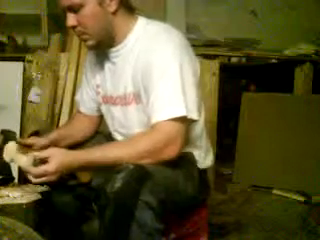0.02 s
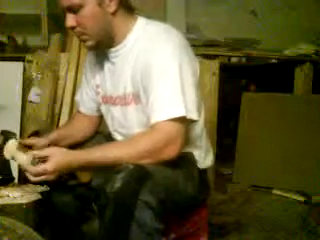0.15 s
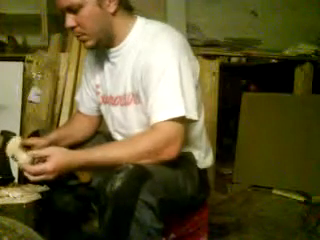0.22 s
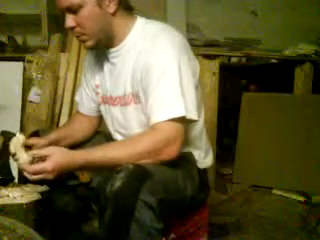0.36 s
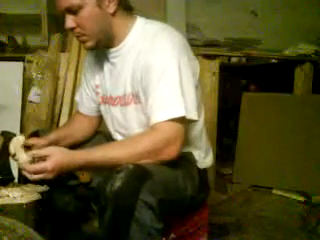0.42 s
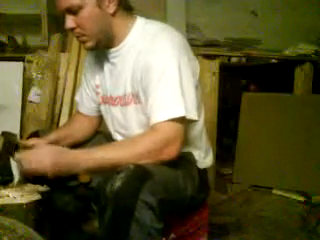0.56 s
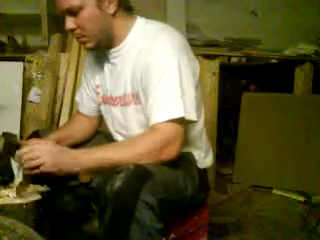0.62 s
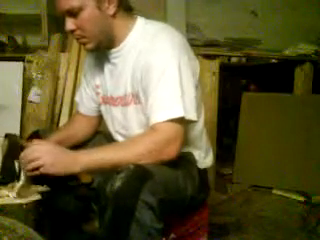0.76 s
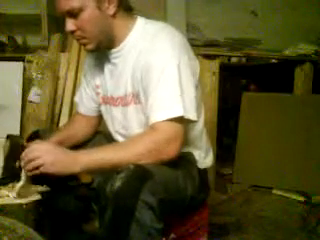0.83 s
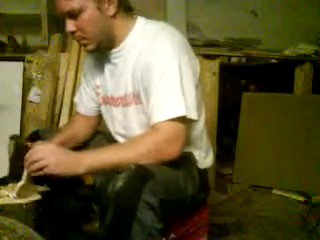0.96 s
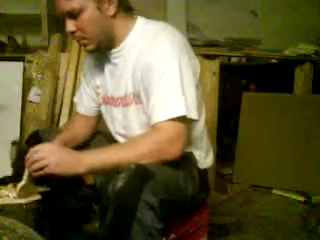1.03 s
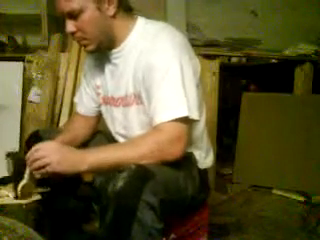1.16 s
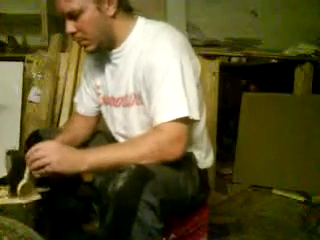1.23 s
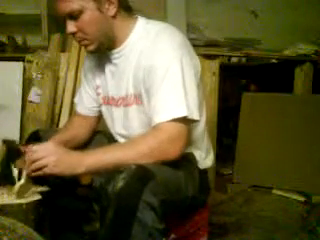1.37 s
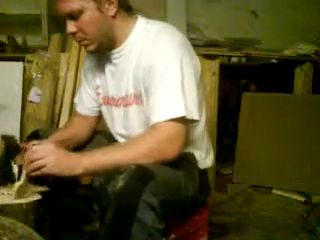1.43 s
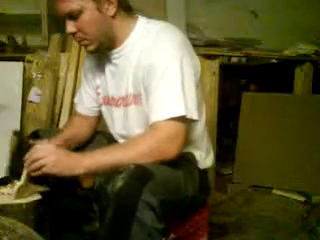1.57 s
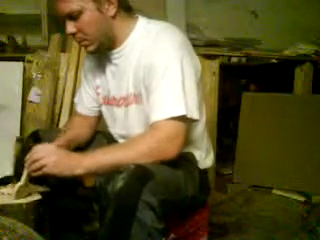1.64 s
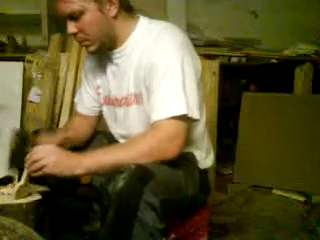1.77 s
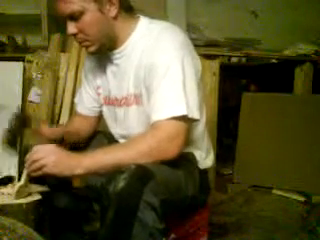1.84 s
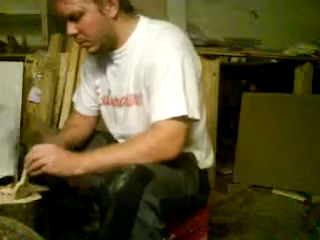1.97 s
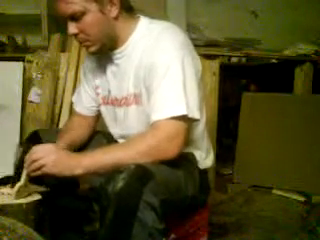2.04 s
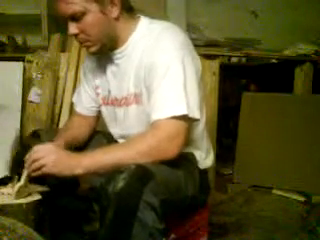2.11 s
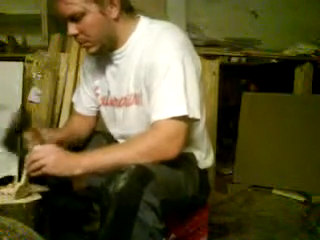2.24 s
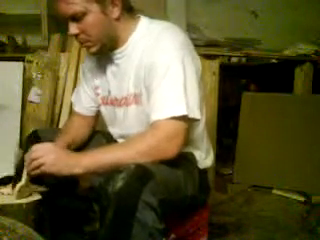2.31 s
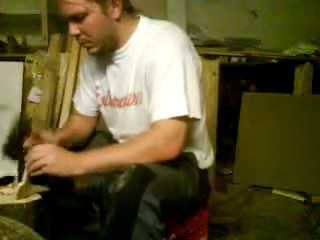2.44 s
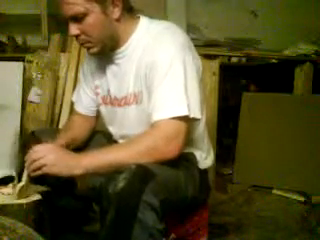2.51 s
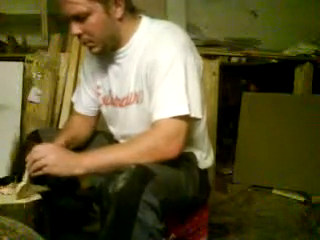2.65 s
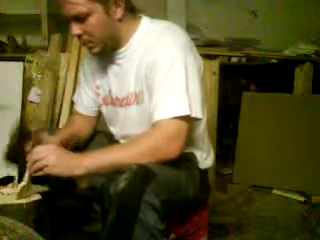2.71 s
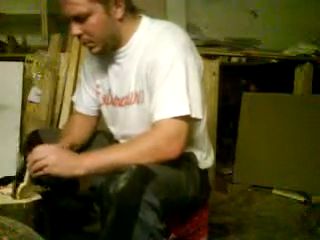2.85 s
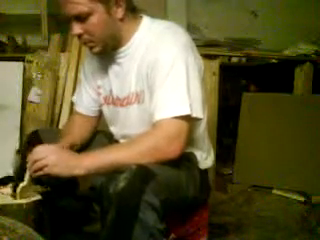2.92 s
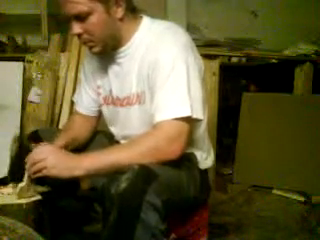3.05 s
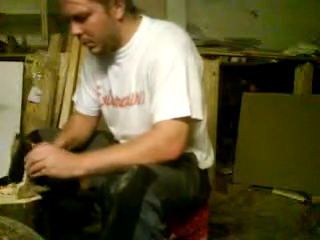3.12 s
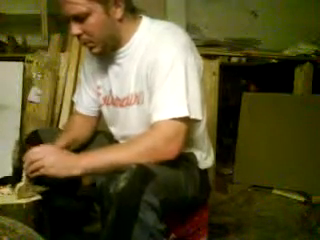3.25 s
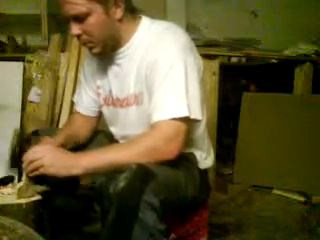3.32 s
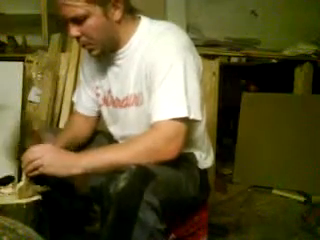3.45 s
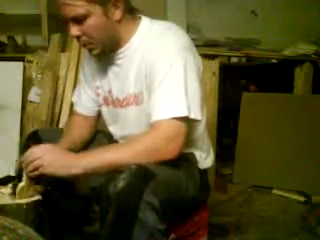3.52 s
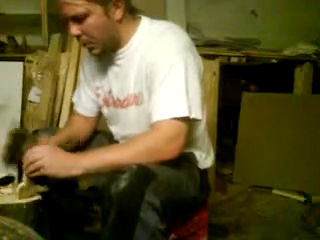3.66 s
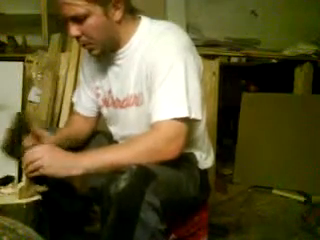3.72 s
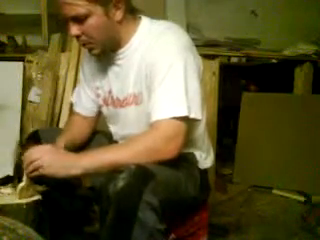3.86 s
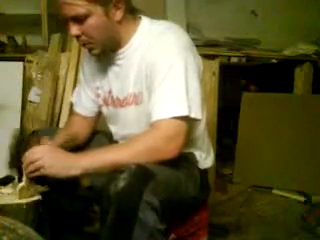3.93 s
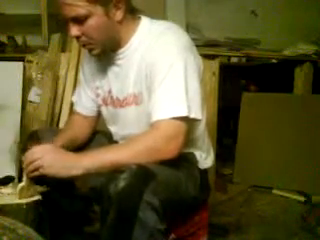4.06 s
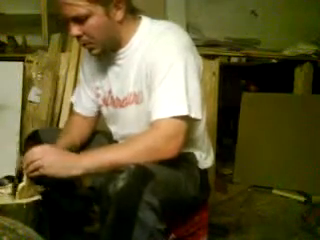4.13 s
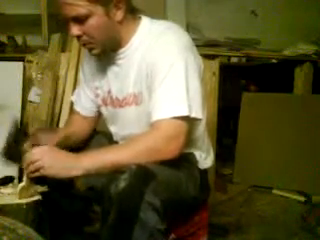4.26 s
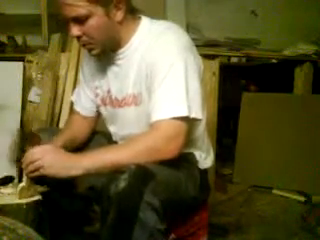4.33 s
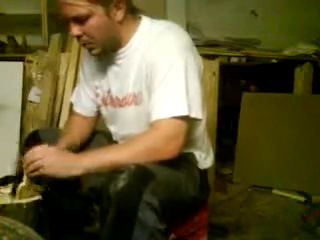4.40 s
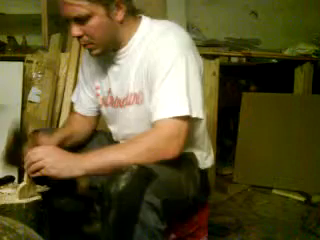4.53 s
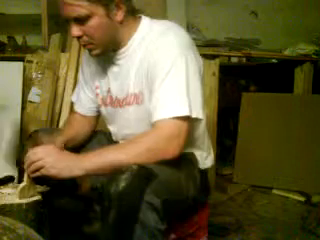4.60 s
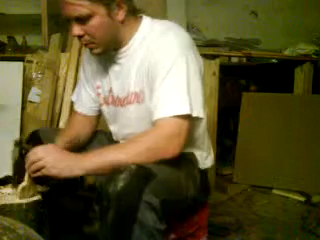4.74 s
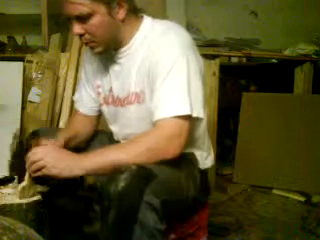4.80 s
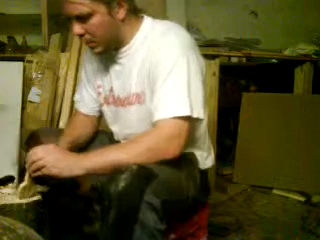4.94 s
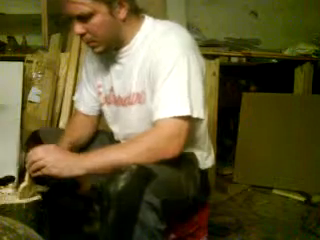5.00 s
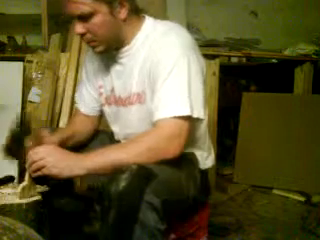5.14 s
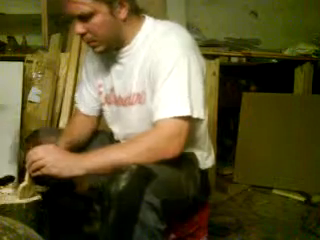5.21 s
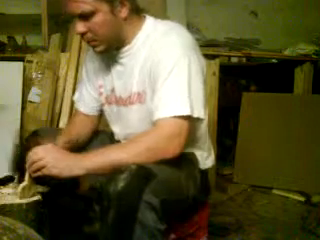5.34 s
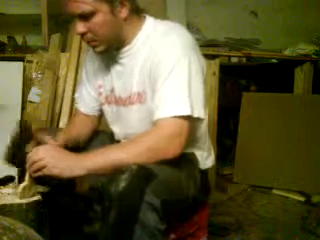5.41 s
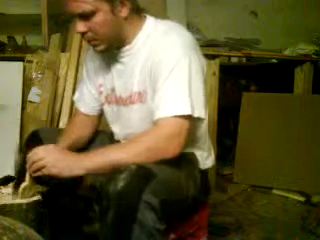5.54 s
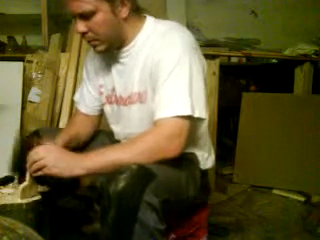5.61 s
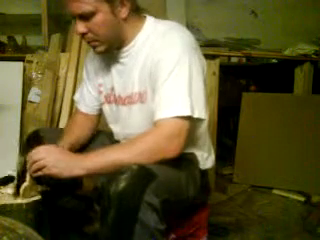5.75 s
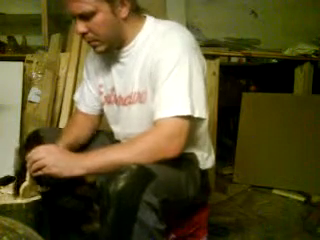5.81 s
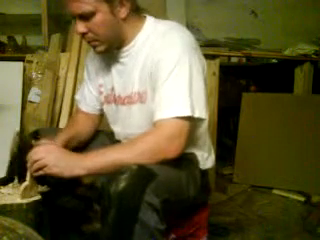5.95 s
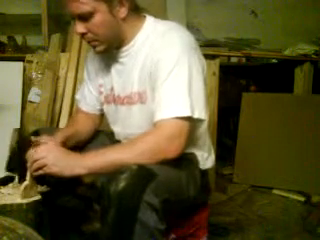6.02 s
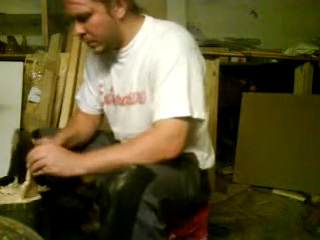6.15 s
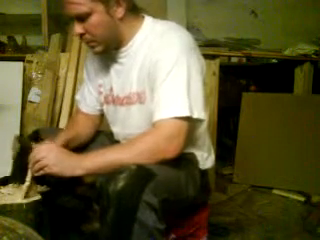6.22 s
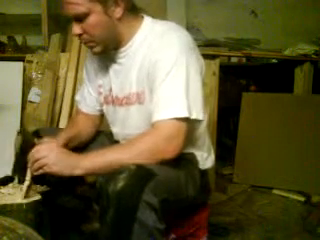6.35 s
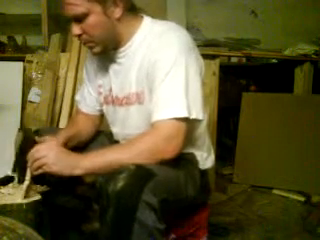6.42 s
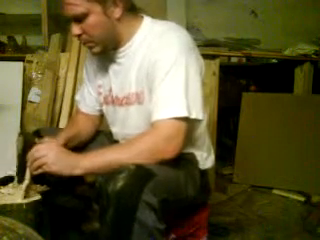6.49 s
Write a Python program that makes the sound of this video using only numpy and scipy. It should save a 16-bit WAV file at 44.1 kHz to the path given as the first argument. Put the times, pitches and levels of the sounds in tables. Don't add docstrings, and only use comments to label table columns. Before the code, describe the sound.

Quiet room hiss opens for about a second, then a few soft taps and a faint scrape of blade on wood. From two seconds, a hatchet chops a billet on a block with sharp, dry cracks and low woody thuds, roughly every 0.3 seconds, in a narrow echoing workshop. A small microphone sounds slightly dull and squashed by the loud blows.

```python
import sys
import numpy as np
from scipy import signal
from scipy.fft import rfft, irfft
from scipy.io import wavfile

SR = 44100
rng = np.random.default_rng(int(sys.argv[2]) if len(sys.argv) > 2 else 0)


def transcribe(signal):
    frames = np.atleast_2d(signal).T
    limited = np.clip(frames, -1, 1)
    pcm = np.round(limited * 32767).astype(np.int16)
    wavfile.write(sys.argv[1], SR, pcm)


def how_loud(loudness_db):
    steps = np.asarray(loudness_db, float) / 20
    return 10 ** steps


N = 289679

KNEE_DB, SQUEEZE = -15, 0.34
# start_s, bite_db, brightness (dB per octave),
BLOWS = [(1.172, -23.5, -5, 0, -60), (1.223, -24.5, -5.5, 2, -21), (1.526, -28.5, -7.5, 0, -44),
         (1.75, -24, -7.5, 2.5, -31.5), (2.1, 3.5, -3.5, -8, -32), (2.407, 3.5, .5, -3, -25),
         (2.698, -5, 2.5, 3, -19), (2.974, -.5, -1.5, 1, -15.5), (3.353, -22.5, -5.5, .5, -48),
         (3.634, .5, -1.5, .5, -13), (3.93, 3, -5, -6, -24), (4.219, 0, 1, -1.5, -13.5),
         (4.493, 2.5, -4.5, -2, -13.5), (4.763, .5, -2, 0, -23), (5.085, 0, .5, -1.5, -24.5),
         (5.352, -1, 1, -1, -23), (5.591, -1.5, -5.5, 0, -15), (5.85, 1.5, -1, 0, -14)]


def rms_one(x):
    return x / np.sqrt(np.mean(x ** 2) + 1e-20)


def at_hz(points, hz):
    table_hz, values = np.array(points).T
    return np.interp(np.log(hz), np.log(table_hz), values)


def before_gain(db):
    over_db = np.maximum(db - KNEE_DB, 0)
    return how_loud(db + over_db * SQUEEZE / (1 - SQUEEZE))


def clicks_at(times_s, gains):
    clicks = np.zeros(N + 1)
    for start_s, gain in zip(times_s, gains):
        clicks[round(start_s * SR)] += gain
    return clicks[:N] + 1e-18


def resonance(x, hz, width_hz):
    r = np.exp(-np.pi * width_hz / SR)
    feedback = [1, -2 * r * np.cos(2 * np.pi * hz / SR), r * r]
    return signal.lfilter([(1 - r * r) / 2, 0, (r * r - 1) / 2], feedback, x)


def sounded(rings, times_s, gains):
    out = 0
    for k, ((hz, width_hz, db), gain) in enumerate(zip(rings, gains)):
        clicks = clicks_at(times_s, gain * how_loud(db))
        narrowed = resonance(clicks, hz, width_hz)
        out = out + (-1) ** k * resonance(narrowed, hz, 2.68 * width_hz)
    return out


def dying_tone(clicks, hz, t60_s):
    r = how_loud(-60 / (t60_s * SR))
    w = 2 * np.pi * hz / SR
    return signal.lfilter([0, np.sin(w)], [1, -2 * r * np.cos(w), r * r], clicks)


def struck(modes, times_s, gains, build_s, spread_db):
    out = 0
    luck = rng.standard_normal((len(times_s), len(modes)))
    for k, (hz, db, t60_s, polarity) in enumerate(modes):
        clicks = clicks_at(times_s, gains * how_loud(db + spread_db * luck[:, k]))
        swell = dying_tone(clicks, hz, build_s * np.log(1000))
        out = out + polarity * (dying_tone(clicks, hz, t60_s) - swell)
    return out


def stroke(start_s, swell_s, hold_s, db, fade_db_s):
    t = np.arange(N) / SR - start_s
    swell = np.clip(t / swell_s, 0, 1) ** 2
    return swell * how_loud(db - fade_db_s * np.maximum(t - swell_s - hold_s, 0))


def hiss():
    # pitch_hz, level_db
    colour = [(20, -16.5), (45, 0.5), (100, -2.5), (220, -0.5), (450, -4), (814, -5.5), (1340, -7.5),
              (3000, -10.5), (6600, -15), (7050, -14), (7250, -37), (8000, -70)]
    # time_s, level_db
    drift = [(0, -50), (1.1, -48.5), (2, -46), (3.3, -46), (5, -44.5), (6.57, -45.5)]
    hz = np.maximum(np.fft.rfftfreq(N, 1 / SR), 1)
    noise = irfft(rfft(rng.standard_normal(N)) * how_loud(at_hz(colour, hz)), N)
    return rms_one(noise) * how_loud(np.interp(np.arange(N) / SR, *np.transpose(drift)))


def slide():
    noise = rng.standard_normal((2, N))
    squeak = rms_one(resonance(noise[0], hz=2934, width_hz=60))
    rustle = rms_one(resonance(noise[1], hz=4500, width_hz=4500))
    return (squeak * stroke(start_s=1.30, swell_s=.03, hold_s=.035, db=-48, fade_db_s=170)
            + rustle * stroke(start_s=1.12, swell_s=.2, hold_s=.07, db=-48, fade_db_s=120))


def landings():
    start_s, bite_db, _, _, thud_db = np.transpose(BLOWS)
    sink_s, tap_db = .011, -15
    return start_s + sink_s * (bite_db > tap_db), bite_db, thud_db


def floor_sway():
    # pitch_hz, level_db, t60_s, polarity
    floor_mode = [(41.9, -1.5, 1, 1)]
    land_s, bite_db, thud_db = landings()
    sway_db = -52 + .4 * bite_db - .6 * np.maximum(thud_db, -25)
    return struck(floor_mode, land_s, how_loud(sway_db), build_s=0.056, spread_db=2.0)


def wall_air():
    # pitch_hz, level_db, t60_s, polarity
    air_modes = [(82.2, -13, .7, 1), (117.2, -6.5, 0.66, -1), (156.2, -1, 0.43, 1), (161.8, -10, 0.36, 1)]
    land_s, bite_db, thud_db = landings()
    wall_db = -13.5 - .25 * thud_db + .12 * bite_db
    gains = before_gain(thud_db) * how_loud(wall_db)
    return struck(air_modes, land_s, gains, build_s=0.0085, spread_db=3.0)


def block_tones():
    # pitch_hz, level_db, t60_s, polarity
    block_modes = [(203, -16, .45, 1), (240, -16, .4, -1), (266, -4, .3, 1), (274.5, -7, .45, 1),
                   (317, 1, .29, -1), (331, 0, .24, 1), (350, -15, .3, -1), (385, -7, .28, 1),
                   (396, -11, .33, 1), (422, -10, .25, -1), (461, -9, .25, 1), (800, -8, .2, -1),
                   (828, -8, .17, 1), (870, -11, .2, -1)]
    land_s, bite_db, thud_db = landings()
    gains = before_gain(thud_db)
    split_hz, deep_db = 295, -17
    lower = [mode for mode in block_modes if mode[0] <= split_hz]
    upper = [mode for mode in block_modes if mode[0] > split_hz]
    reach = how_loud(.45 * np.minimum(thud_db - deep_db, 0))
    hum = struck(lower, land_s, gains * how_loud(2.5), build_s=0.007, spread_db=2.5)
    hum = hum + struck(upper, land_s, gains * reach * how_loud(3.5), build_s=0.0088, spread_db=2.5)
    jolt_hz, fall_db = 275, 22
    near = [(hz, -fall_db * np.log2(hz / jolt_hz) ** 2, t60_s, sign)
            for hz, _, t60_s, sign in block_modes]
    enter_s = np.array(BLOWS)[:, 0]
    return hum + struck(near, enter_s, how_loud(-35 + .7 * bite_db), build_s=0.004, spread_db=3.0)


def foot_knock():
    # pitch_hz, width_hz, level_db
    foot_rings = [(345, 270, -11.5), (580, 300, -11.5), (768.5, 87, -3), (1207, 130, -9.5)]
    land_s, bite_db, thud_db = landings()
    knock_db = 49 + .9 * thud_db - .12 * bite_db
    gains = before_gain(thud_db) * how_loud(knock_db)
    return sounded(foot_rings, land_s, [gains] * len(foot_rings))


def grazes(level_db):
    # start_s, level_db, pitch_hz
    touches = [(2.4, -36, 3200), (2.69, -25, 1600), (2.968, -24, 4200), (3.923, -26, 1600),
               (4.216, -22, 2200), (4.4885, -16, 4300), (4.756, -30, 1900), (4.761, -23, 3500),
               (5.075, -27, 1700), (5.082, -11, 1200), (5.0805, -19, 5200), (5.849, -24, 4500),
               (5.59, -17, 3000), (3.367, -36, 5000), (1.38, -40, 1400)]
    out = 0
    for start_s, db, hz in touches:
        out = out + sounded([(hz, 0.33 * hz, db)], [start_s], np.array([[how_loud(level_db)]]))
    return out


def cracks(level_db, chip_db, chip_width_hz):
    # pitch_hz, width_hz, level_db
    bite_rings = [(770, 610, -1), (1325, 1030, -3.5), (2098, 920, 0), (3565, 1160, -2), (5064, 1480, -3.5),
                  (7230, 460, -12)]
    # main_hz, level_db, second_hz
    chips = [(1800, -13, 1330), (1470, -17, 2130), (1850, -18.5, 1240), (1300, 0, 1050), (3770, 10, 5550),
             (5640, 4.5, 3770), (3690, 8, 4100), (3430, .5, 6300), (1340, -13.5, 3820), (910, 9, 2310),
             (5300, 4, 1830), (1270, 9.5, 2170), (1020, 2.5, 2290), (2270, 3.5, 3210), (5210, 6, 1210),
             (1290, 11, 4750), (3800, -2, 3020), (4620, 10.5, 5160)]
    start_s, bite_db, bright, hollow, _ = np.transpose(BLOWS)
    ring_hz = np.array(bite_rings)[:, :1]
    octaves = np.log2(ring_hz[:-1] / 2000)
    rings_db = bite_db + bright * octaves + hollow * octaves ** 2
    rings_db = np.vstack([rings_db, rings_db[2:].mean(axis=0)])
    peak_db = np.max(rings_db, axis=0) - 10
    gains = before_gain(peak_db) * how_loud(level_db - peak_db)
    out = sounded(bite_rings, start_s, gains * how_loud(rings_db))
    for gain, at_s, (main_hz, db, second_hz) in zip(gains, start_s, chips):
        for hz, tone_db in (main_hz, db), (second_hz, db - 5):
            in_step = (-1) ** np.argmin(np.abs(np.log(ring_hz / hz)))
            width_hz = chip_width_hz + .07 * hz
            out += sounded([(hz, width_hz, tone_db + chip_db)], [at_s], np.array([[in_step * gain]]))
    return out


def shop(x, wet_db, build_s, patchy_db, uneven):
    # pitch_hz, t60_s
    echo_t60 = [(200, 1), (500, 0.25), (1100, 0.27), (2900, 0.25), (5500, 0.22), (7200, 0.18)]
    t = np.arange(SR // 2) / SR
    edges_hz = 100 * 2 ** np.arange(0, 6.5, .25)
    clump_s = np.arange(0, .51, .009)
    white = rng.standard_normal((2, len(t)))
    tail = 0
    for k, (low, high) in enumerate(zip(edges_hz, edges_hz[1:])):
        band_pass = signal.butter(2, [low, high], "band", fs=SR, output="sos")
        band = signal.sosfilt(band_pass, white[k % 2])
        t60_s = at_hz(echo_t60, np.sqrt(low * high)) * np.exp(uneven * rng.standard_normal())
        clumps_db = patchy_db * np.interp(t, clump_s, rng.standard_normal(len(clump_s)))
        tail = tail + band * how_loud(clumps_db - 60 * t / t60_s)
    tail *= 1 - np.exp(-t / build_s)
    tail *= how_loud(wet_db) / np.sqrt(np.sum(tail ** 2))
    tail[0] += 1
    return signal.fftconvolve(x, tail)[:N]


def scene():
    sharp = cracks(level_db=8, chip_db=-4.0, chip_width_hz=150) + grazes(level_db=19) + foot_knock()
    blow = np.searchsorted(np.array(BLOWS)[:, 0] - .015, np.arange(N) / SR)
    echoed = 0
    for k in range(4):
        part = sharp * (blow % 4 == k)
        echoed = echoed + shop(part, wet_db=13, build_s=0.00097, patchy_db=2.0, uneven=0.035)
    thuds = block_tones() + wall_air() + floor_sway()
    return (echoed + thuds + slide() + hiss())[None]


def low_pass(x):
    return signal.sosfilt(signal.butter(12, 7440, fs=SR, output="sos"), x)


def record(dry):
    release_db_s, attack_s = 22, 0.00067
    ramp_db = release_db_s * np.arange(N) / SR
    level_db = 20 * np.log10(np.abs(dry[0]) + 1e-9)
    duck_db = SQUEEZE * np.maximum(level_db - KNEE_DB, 0)
    held_db = np.maximum.accumulate(duck_db + ramp_db) - ramp_db
    r = np.exp(-1 / (attack_s * SR))
    x = dry * how_loud(-signal.lfilter([1 - r], [1, -r], held_db))
    x = 0.51 * np.tanh(x / 0.51)
    top_cut = signal.cheby2(12, 68, 8180, fs=SR, output="sos")
    return low_pass(signal.sosfilt(top_cut, x))


dry = scene()
out = record(dry)
transcribe(out)
```